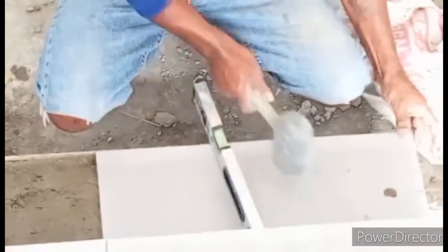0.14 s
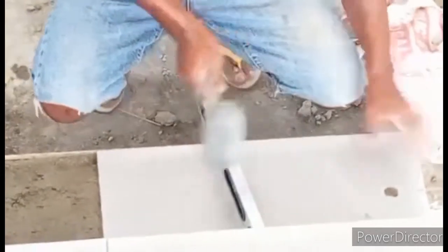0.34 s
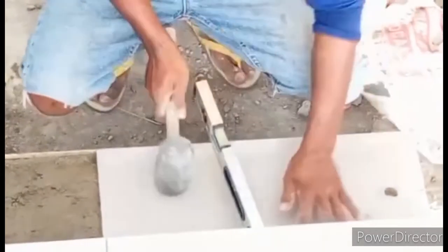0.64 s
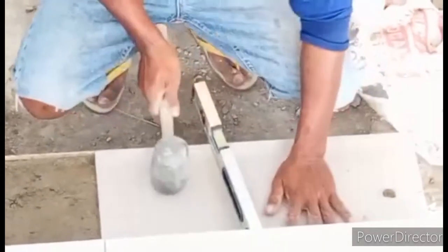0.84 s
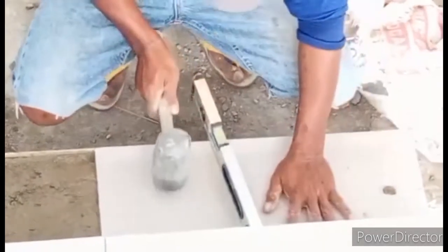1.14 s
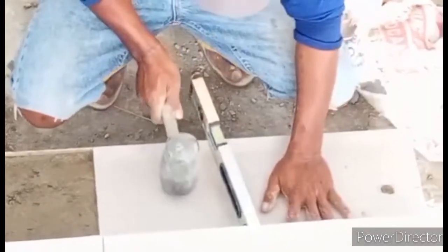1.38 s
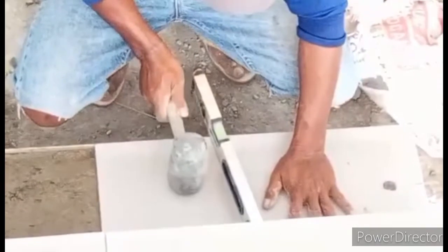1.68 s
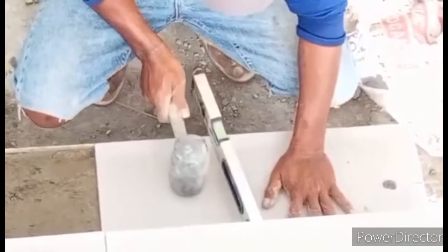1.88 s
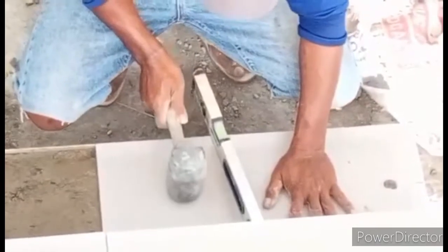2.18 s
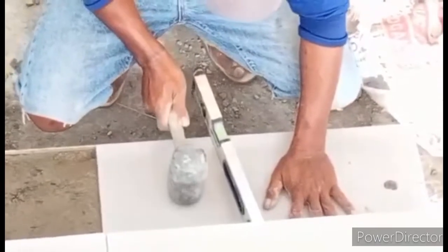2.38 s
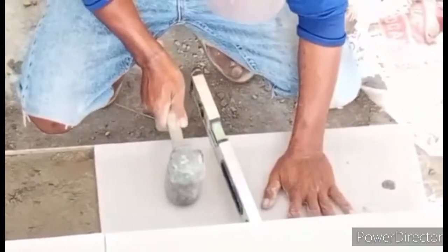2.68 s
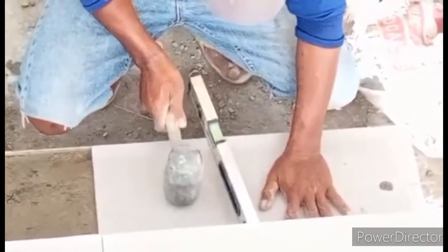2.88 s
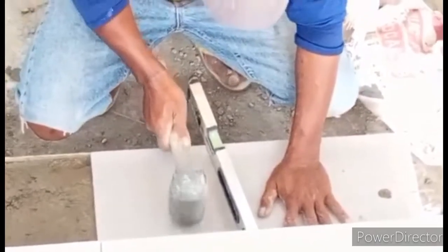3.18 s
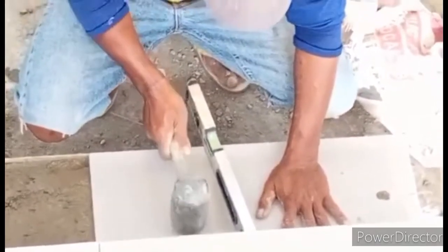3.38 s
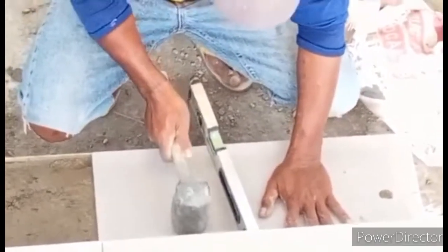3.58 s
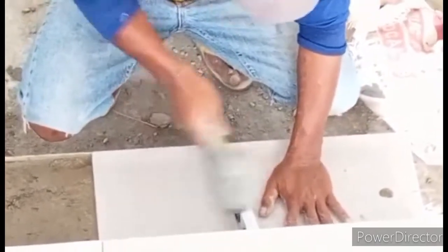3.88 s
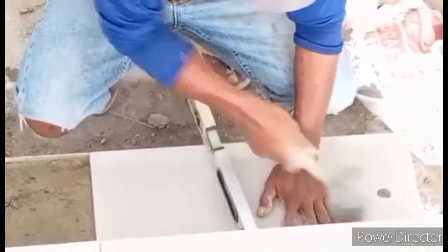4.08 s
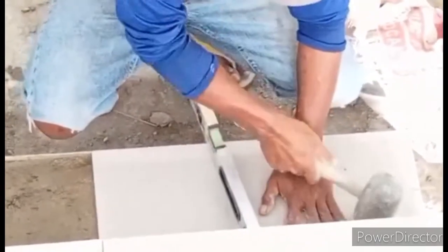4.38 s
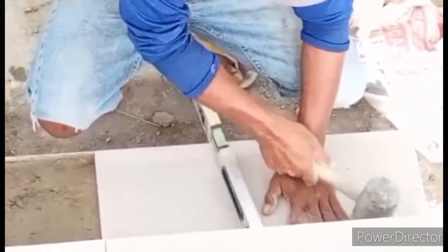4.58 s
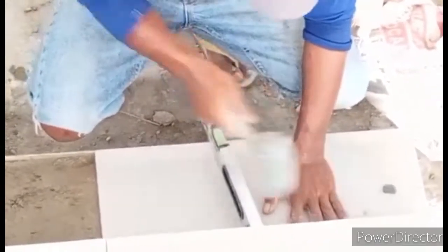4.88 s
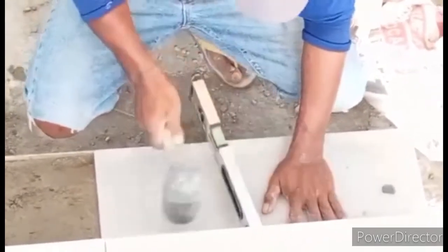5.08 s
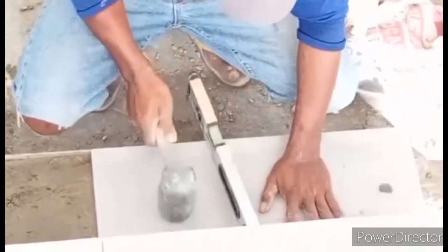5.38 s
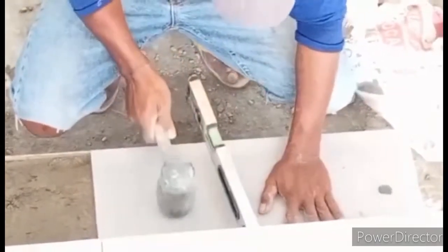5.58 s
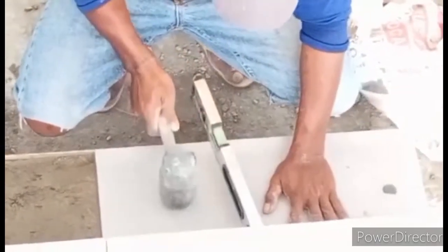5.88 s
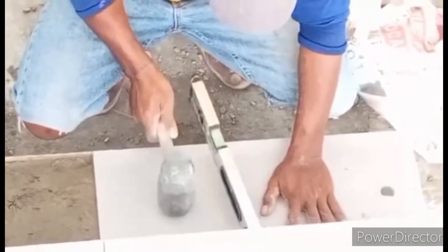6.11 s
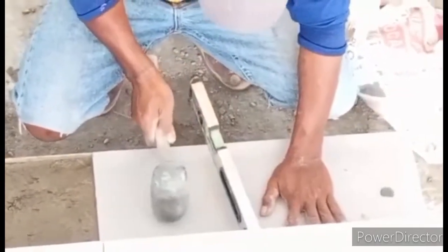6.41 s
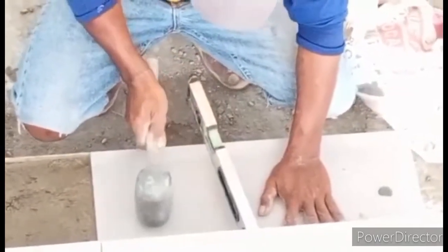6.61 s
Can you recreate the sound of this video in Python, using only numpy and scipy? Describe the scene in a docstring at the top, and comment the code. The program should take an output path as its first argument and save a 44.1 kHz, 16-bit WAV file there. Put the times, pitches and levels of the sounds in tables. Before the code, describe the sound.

Runs of rounded mallet thuds on a floor tile, each with a faint slap and short fluttering echo, begin lightly and grow firm, with sandy scraping between. Blows stop near five seconds, leaving quiet air. Then come coarse scrapes, one bright double-contact clack, and three dull hollow knocks overlapping a last scrape. Thin distant whistles and soft rumble fill the reverberant stairwell, heard by one nearby microphone with muted highs.

```python
"""Tapping a floor tile into mortar

A rubber mallet taps a floor tile down into its mortar bed, in quick runs of blows, in a bare stairwell.
Each blow is a dull thud (a short low sine) with a light slap (coloured noise) and a faint ring.
The hard walls throw it back as a short flutter of echoes, a noisy tail and a boom.
Nearby, gritty mortar is scraped (sand-like clicks), a hard tool is put down once with a clack, and
hollow knocks follow. Behind lie thin distant whistles and chirps, steady air and a low rumble.
"""
import sys
import numpy as np
from scipy import signal
from scipy.io import wavfile
from scipy.ndimage import uniform_filter1d

SR = 44100
rng = np.random.default_rng(int(sys.argv[2]) if len(sys.argv) > 2 else 0)


def unload_wav(signal):
    """Save mono or channel-first audio to the path in sys.argv[1] as 16-bit WAV at rate SR, clipped to [-1, 1]."""
    wavfile.write(
        sys.argv[1],
        SR,
        np.round(np.clip(np.atleast_2d(signal).T, -1, 1) * 32767).astype(np.int16),
    )


N = 297596

# mallet blows: (time [s], force [dB], slap [dB], spot struck)
MALLET_BLOWS = [(0.1132, -18, -45, "middle"), (0.3238, -15.5, -38.5, "middle"),
                (0.4846, -19.5, -48, "middle"), (0.7218, -20, -46, "middle"),
                (0.9398, -14, -38.3, "middle"), (1.265, -6, -32, "middle"), (1.479, -6, -33.3, "middle"),
                (1.6673, -2.5, -26.5, "middle"), (2.2148, -15.3, -37.5, "hollow"),
                (2.4156, -18.5, -39, "hollow"), (2.588, -19.5, -40.5, "hollow"), (3.1912, -7, -35, "edge"),
                (3.4026, -4, -32, "edge"), (3.607, -4.5, -32, "edge"), (3.8055, -5, -32.5, "edge"),
                (3.9961, -5.5, -30.5, "bedded"), (4.1761, -4.5, -33, "bedded"), (4.3494, -5, -32, "bedded"),
                (4.5715, -6, -37, "bedded"), (4.7451, -6, -37.5, "bedded"),
                (4.8915, -10.5, -41.5, "middle")]
# how a blow of 0 dB sounds at each spot of the tile:
# name: (thud rise [s], tile ring [dB], boom [dB], late wall echo [dB])
TILE_SPOTS = {"middle": (.0051, -25.7, -23, -35), "hollow": (0.0034, -46, -8, -4),
              "edge": (0.0051, -33, -22, -26), "bedded": (0.0052, -41, -24.5, -30)}
# tone colour of low rumble, also used for the drag of the blade: (frequency [Hz], level [dB per Hz])
LOW_RUMBLE = [(20, -22), (50, -25), (90, -3), (130, 7.5), (180, 0), (260, -7), (450, -13), (900, -17.5),
              (3000, -46.5)]


def thuds(tail_db=-17):
    """The soft head loads the bedded tile, which swings for a few cycles and is damped by the mortar."""
    thud_hz, stiffen_hz_per_db = 314.2, 2  # pitch at 0 dB; harder blows compress the rubber and sound higher
    echo_s = .0335  # the far wall returns the thud this long after the blow, strongest for the hollow taps
    out = np.zeros(N)
    t = np.arange(SR // 20) / SR
    for s, force_db, _, spot in MALLET_BLOWS:
        rise_s, _, _, echo_db = TILE_SPOTS[spot]
        hz = thud_hz + stiffen_hz_per_db * force_db
        swell = (t / rise_s * np.exp(1 - t / rise_s)) ** 3
        thud = amp(force_db) * swell * np.sin(2 * np.pi * hz * t)
        add(out, s, -thud)
        add(out, s + echo_s, amp(echo_db) * thud)
    # the diffuse tail takes over as the distinct echoes thin out
    tail = reverb(out, start_s=.07, build_s=.09)
    return flutter(out) + amp(tail_db) * tail


def ringing():
    """Each blow leaves a faint note in the tile and a boom between the walls, by its force and spot."""
    # ringing of the tile: (frequency [Hz], level [dB], time to fade by 60 dB [s])
    tile_modes = [(847, 6.5, .3), (874, -7, 0.37), (671, -6, 0.2), (742, -3, 0.31), (534, -5, 0.28),
                  (1170, -7, 0.37)]
    # standing waves of the stairwell: (frequency [Hz], level [dB], time to fade by 60 dB [s])
    boom_modes = [(116.5, 5, 0.28), (142.5, -18.5, 0.9), (159, -25, 0.1), (187, -11, 0.84)]
    note = ring(tile_modes, rise_s=0.0023)
    boom = ring(boom_modes, rise_s=0.03)
    out = np.zeros(N)
    for s, force_db, _, spot in MALLET_BLOWS:
        _, ring_db, boom_db, _ = TILE_SPOTS[spot]
        add(out, s, amp(force_db) * (amp(ring_db) * note + amp(boom_db) * boom))
    return out


def slaps(body_db=5, bloom_s=0.011, alike=0.2, snap_db=-0.5, snap_hz=1800, hardening=.6, tail_db=-2.0):
    """Rubber snaps on the glaze; then the plate and the grit under it chatter as the tile sinks."""
    # tone colour of rubber slapping on glaze: (frequency [Hz], level [dB per Hz])
    slap_colour = [(30, -24), (100, -15), (300, 8.5), (480, 3), (700, -1.5), (1200, -4.5), (1800, -10),
                   (2600, -13.5), (3600, -17.5), (4800, -26), (7300, -24.5), (13000, -28)]
    t = np.arange(SR // 8) / SR
    bloom = t / bloom_s * np.exp(1 - t / bloom_s)
    # the plate's noise is the same at every blow; the grit's noise is new each time
    plate = rng.standard_normal(len(t))
    chatter = np.zeros(N)
    for s, _, slap_db, _ in MALLET_BLOWS:
        grit = rng.laplace(size=len(t)) / np.sqrt(2)
        rattle = alike * plate + np.sqrt(1 - alike ** 2) * grit
        add(chatter, s, amp(slap_db + body_db) * bloom * rattle)
    # rubber stiffens under a hard blow, which makes the bright snap stronger
    snap_rows = [(s, slap_db + snap_db + hardening * force_db) for s, force_db, slap_db, _ in MALLET_BLOWS]
    snap = bursts(snap_rows, decay_s=0.012)
    snap = signal.lfilter(*signal.butter(1, snap_hz, "high", fs=SR), snap)
    slap = colour(chatter + flutter(snap), slap_colour)
    return slap + amp(tail_db) * shifting_reverb(slap, start_s=0.005, build_s=0.0035)


def scraping(scrape_db=-1.5, grain_db=0.5, grains_per_s=5000, tail_db=-5, fine_hz=5000,
             catch_db=.6, catch_hz=70, crumble_db=1.4, crumble_hz=20):
    """Sand grains catch and slip under a dragging blade in strokes; loose grit crunches in between."""
    # strokes of a blade through mortar:
    # (strongest push [s], level [dB], swell [s], fade [s], fine sand [dB], low drag [dB])
    strokes = [(.34, -42.5, 0.051, .055, -11, -6), (.565, -45, 0.084, 0.086, -5, -5),
               (.88, -49, 0.048, 0.082, -12, -5), (1.762, -37.7, 0.032, 0.039, 0, -15),
               (2.038, -38.5, .02, .045, -11, 0), (2.19, -26.7, .085, .05, -17, -22),
               (2.48, -41.5, .05, .14, -21, -15), (3.301, -43, 0.033, .06, -14, -15),
               (5.635, -45, .015, .03, -8, -3), (5.709, -32.5, .033, 0.12, -0.5, -12),
               (5.835, -31.8, .035, .045, -6, -6), (6.646, -31, .017, 0.091, -22, -25),
               (6.745, -28.5, 0.026, .06, -28, -25)]
    stroke_shape = 1.07  # 1 gives a pointed push, 2 a rounded one
    # loose grit crunching faintly between the strokes: (time [s], level [dB])
    crumbling = [(0, -58.5), (1.2, -56), (2.4, -50), (2.8, -55), (3.3, -51), (3.8, -57), (5.1, -55.5),
                 (6.75, -57)]
    # tone colour of the grit: (frequency [Hz], level [dB per Hz])
    grit_colour = [(300, -44.5), (700, -23), (1300, -13.5), (2000, -5.5), (3000, 0), (3800, -4), (5000, -8),
                   (7500, -9), (9500, -11), (13000, -18)]
    # each grain is one click of random sign and slightly random strength
    is_grain = rng.random(N) < grains_per_s / SR
    strength = amp(grain_db * np.minimum(rng.exponential(1, N), 4))
    grains = is_grain * rng.choice([-1, 1], N) * strength
    grit = colour(grains, grit_colour)
    grit = evened(grit + amp(tail_db) * reverb(grit, start_s=0.013, build_s=0.0087))
    fine = signal.sosfiltfilt(signal.butter(2, fine_hz, "high", fs=SR, output="sos"), grit)
    drag = colour(rng.standard_normal(N), LOW_RUMBLE)
    # strokes that overlap add up as power, one row for each layer: grit, fine sand, low drag
    power = np.zeros((3, N))
    power[0] = (level(crumbling) * amp(crumble_db * wander(crumble_hz))) ** 2
    t = np.arange(-SR // 3, SR // 2) / SR
    for s, db, swell_s, fade_s, fine_db, drag_db in strokes:
        push = amp(db) * np.exp(-np.maximum(-t / swell_s, t / fade_s) ** stroke_shape)
        for layer, share_db in zip(power, (0, fine_db, drag_db)):
            add(layer, s + t[0], (amp(share_db) * push) ** 2)
    scrape = (np.sqrt(power) * [grit, fine, drag]).sum(0)
    return amp(scrape_db + catch_db * wander(catch_hz)) * scrape


def clack(click_db=19, rattle_db=1, rattle_s=0.01, ring_db=-31, tail_db=3):
    """A hard tool lands, bounces, rattles and rings briefly."""
    # contacts of the tool: (time [s], level [dB])
    contacts = [(5.94, -21), (5.9469, -24), (5.954, -51)]
    # tone colour of the contacts: (frequency [Hz], level [dB per Hz])
    clack_colour = [(40, -19), (130, 0), (300, -3), (420, -4), (520, -2), (900, -9.5), (1300, 2.5),
                    (1800, 4), (2400, 5), (3200, -5), (3700, 6), (4100, -4), (4350, -20), (7500, -21),
                    (13000, -26)]
    # ringing of the tool: (frequency [Hz], level [dB], time to fade by 60 dB [s])
    tool_modes = [(1200, -10, .25), (1580, -2, .3), (1900, -7, 0.28), (2346, -12, 0.32), (2800, -9, .35),
                  (3600, 5, .45), (3740, 36, .02), (3740, 1, 0.34)]
    clicks = np.zeros(N)
    for s, db in contacts:
        add(clicks, s, amp([db + click_db]))  # a single sample
    rattle = bursts(contacts, decay_s=rattle_s)
    out = colour(clicks + amp(rattle_db) * rattle, clack_colour)
    for s, db in contacts:
        add(out, s, amp(db + ring_db) * ring(tool_modes, rise_s=.0005))
    return out + amp(tail_db) * reverb(out, start_s=0.0015, build_s=0.0013)


def knocks(bump_db=-4, hollow_hz=850, hollow_db=7, hollow_t60=0.078, tail_db=-5):
    """Soft hollow bumps, as of a trowel against a tub: dull noise and one short note."""
    # hollow knocks before the last scrape: (time [s], level [dB])
    bumps = [(6.522, -34.5), (6.583, -30.5), (6.655, -34)]
    # tone colour of the bumps: (frequency [Hz], level [dB per Hz])
    knock_colour = [(100, -28), (500, -13.5), (720, -3.5), (860, -8), (1050, -11), (1700, -15), (3500, -39),
                    (5000, -23), (12000, -43)]
    out = amp(bump_db) * colour(bursts(bumps, decay_s=0.036), knock_colour)
    for s, db in bumps:
        add(out, s, amp(db) * ring([(hollow_hz, hollow_db, hollow_t60)], rise_s=0.0059))
    return out + amp(tail_db) * reverb(out, start_s=0.0059, build_s=0.0039)


def whistles(waver=.01, direct_db=-6, tail_db=-3):
    """Thin, unsteady chirps and whistles from further off in the building, blurred by the walls."""
    # faint distant whistles: (time [s], length [s], start [Hz], end [Hz], level [dB])
    glides = [(0.25, 1.38, 1966, 1734, -60), (3.28, 0.32, 8880, 8850, -50), (4.245, 0.095, 1485, 1455, -40)]
    # a thin chirp with three partials: (time [s], low [dB], middle [dB], high [dB])
    chirps = [(0.821, -52.5, -48, -57), (1.337, -49.5, -62, -52), (1.945, -48.5, -65, -65),
              (2.942, -54, -53, -53.5)]
    # starting pitch of the partials: (low [Hz], middle [Hz], high [Hz])
    partials_hz = (2750, 4385, 9850)
    chirp_s, chirp_sag = 0.12, 0.0081  # length, and share by which the pitch falls
    out = np.zeros(N)
    for s, length_s, start_hz, end_hz, db in glides:
        add(out, s, amp(db) * tone(length_s, start_hz, end_hz, waver))
    for s, *partials_db in chirps:
        for hz, db in zip(partials_hz, partials_db):
            add(out, s, amp(db) * tone(chirp_s, hz, hz * (1 - chirp_sag), waver))
    return amp(direct_db) * out + amp(tail_db) * reverb(out, start_s=.003, build_s=.003)


def background(air_db=-46, rumble_db=-0.5, uneven_db=1.1, uneven_hz=9):
    """Steady air of the building site and an uneven low rumble, both coloured noise."""
    # tone colour of the air: (frequency [Hz], level [dB per Hz])
    air_colour = [(20, -32), (50, -12.5), (80, -5.5), (140, 2), (190, -2.5), (300, -2), (480, -12.5),
                  (750, -9), (1200, -15), (3300, -15.5), (4500, -22), (9000, -23.5), (13000, -28.5)]
    # level of the low rumble, which sinks once the tapping ends: (time [s], level [dB])
    rumbling = [(0, -36.5), (.9, -43), (4.9, -43.5), (5.25, -50.5), (6.75, -52)]
    air, rumble = rng.standard_normal((2, N))
    unevenness = amp(rumble_db + uneven_db * wander(uneven_hz))
    rumble = unevenness * level(rumbling) * colour(rumble, LOW_RUMBLE)
    return amp(air_db) * colour(air, air_colour) + rumble


def flutter(x):
    """The direct sound and its first distinct echoes: delayed copies from the hard surfaces."""
    # paths from the tile to the microphone by floor, steps and walls: (delay [s], signed gain [factor])
    echo_paths = [(0, 1), (.0034, -.38), (.00742, -.27), (.01366, -.83), (.02288, .15), (.03339, -.58),
                  (.04043, .26), (.04751, -.21), (.05039, .29), (.06272, -.21), (.07848, -.09),
                  (.09541, .13), (.10804, .11), (.12081, -.09)]
    out = np.zeros(N)
    for delay_s, gain in echo_paths:
        add(out, delay_s, gain * x)
    return out


def reverb(x, start_s, build_s, size=20):
    """Diffuse tail: sparse taps of random sign, each frequency band dying at its own speed."""
    # how long the stairwell rings on: (frequency [Hz], time to fade by 60 dB [s])
    fade_times = [(100, 0.25), (300, 0.69), (1000, 0.68), (3000, 0.57), (8000, 0.42)]
    # one tap at a random place in every stretch of `size` samples
    taps = np.zeros(SR)
    at = np.arange(0, SR - size, size)
    taps[at + rng.integers(0, size, len(at))] = rng.choice([-1, 1], len(at))
    taps *= 1 - np.exp(-np.maximum(np.arange(SR) / SR - start_s, 0) / build_s)
    hz, t, bands = signal.stft(taps, SR, nperseg=256)
    fading = amp(-60 * t / read(fade_times, hz)[:, None])
    tail = signal.istft(bands * fading, SR)[1]
    return signal.fftconvolve(x, tail / np.linalg.norm(tail))[:N]


def shifting_reverb(x, start_s, build_s, count=3):
    """Random diffuse tails that fade into one another, so the room's tail varies from blow to blow."""
    turn = np.pi * np.arange(N) / SR / .6  # half a turn every 0.6 s
    tails = sum(reverb(x * np.cos(turn + np.pi * k / count), start_s, build_s) for k in range(count))
    return tails * np.sqrt(2 / count)  # keeps the total power steady


def ring(modes, rise_s):
    """Dying sines that build up over rise_s, from (Hz, dB, seconds to fade by 60 dB) rows."""
    t = np.arange(SR) / SR
    sines = sum(amp(db - 60 * t / t60) * np.sin(2 * np.pi * hz * t) for hz, db, t60 in modes)
    return (1 - np.exp(-t / rise_s)) * sines


def bursts(rows, decay_s):
    """One short rough contact, a dying burst of noise, for every (s, dB) row."""
    out = np.zeros(N)
    t = np.arange(SR // 10) / SR
    for s, db in rows:
        add(out, s, amp(db) * rng.standard_normal(len(t)) * np.exp(-t / decay_s))
    return out


def tone(length_s, start_hz, end_hz, waver):
    """One unsteady gliding tone with soft ends and an rms (average strength) of one."""
    n = round(length_s * SR)
    drift = evened(uniform_filter1d(rng.standard_normal(2 * SR)[:n], size=250))
    hz = np.linspace(start_hz, end_hz, n) * (1 + waver * drift)
    return evened(np.sin(2 * np.pi * np.cumsum(hz) / SR) * signal.windows.tukey(n, .5))


def wander(rate_hz, count=24):
    """Slow random drift with an rms of one: sines of random phase up to rate_hz, the slow ones larger."""
    t = np.arange(0, N, 128) / SR
    hz = np.geomspace(rate_hz / 10, rate_hz, count)
    drift = np.sin(2 * np.pi * (hz * t[:, None] + rng.random(count))) @ hz ** -.5
    return np.interp(np.arange(N) / SR, t, evened(drift))


def colour(x, spectrum):
    """Gives a sound a tone colour; the filter is scaled to keep the energy of white noise."""
    taps = causal(spectrum)
    return signal.oaconvolve(x, taps / np.linalg.norm(taps))[:len(x)]


def causal(spectrum, size=4096):
    """Filter taps with the given (Hz, dB) response that act as early as possible (minimum phase)."""
    db = read(spectrum, abs(np.fft.fftfreq(size, 1 / SR)))
    log_gain = np.log(amp(np.maximum(db, -100)))
    return np.fft.ifft(np.exp(np.conj(signal.hilbert(log_gain)))).real[:size // 2]


def amp(db):
    """Decibels to gain."""
    return 10 ** (np.asarray(db) / 20)


def evened(x):
    """Scales to an rms of one."""
    return x / np.sqrt(np.mean(x ** 2) + 1e-20)


def read(points, hz):
    """Joins (Hz, value) points by straight lines on a log-frequency axis."""
    f, value = np.transpose(points)
    return np.interp(np.log(hz + 1), np.log(f + 1), value)


def level(rows):
    """Gain at every sample from (s, dB) rows."""
    return amp(np.interp(np.arange(N) / SR, *np.transpose(rows)))


def add(mix, s, sound):
    """Mixes a sound in at time s."""
    part = mix[max(round(s * SR), 0):][:len(sound)]
    part += sound[:len(part)]


def scene():
    """All sources at one microphone."""
    mallet = thuds() + ringing() + slaps()
    # a small tile radiates little deep bass
    mallet = signal.lfilter(*signal.butter(1, 55, "high", fs=SR), mallet)
    return (mallet + scraping() + clack() + knocks() + whistles() + background())[None]


def record(dry):
    """The microphone's colour, then the recorder's band limit."""
    # colour of the microphone and its port: (frequency [Hz], level [dB])
    microphone_colour = [(20, -4), (70, 1), (3700, -0.5), (4200, -6.5), (5100, -13.5), (6200, -10.5),
                         (7500, -4), (8200, -11.5), (9200, -20.5), (11000, -23.5), (13000, -23)]
    edge_hz = 13100  # the treble is cut off above this
    heard = signal.oaconvolve(dry, causal(microphone_colour)[None])[:, :N]
    band_limit = signal.firwin(511, edge_hz, window=("kaiser", 9), fs=SR)
    return signal.oaconvolve(heard, band_limit[None], "same")


dry = scene()
out = record(dry)
unload_wav(out)
```